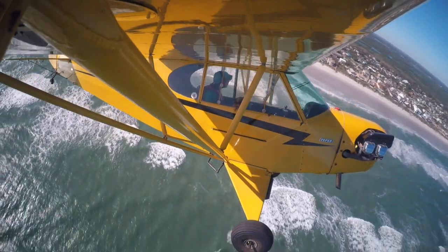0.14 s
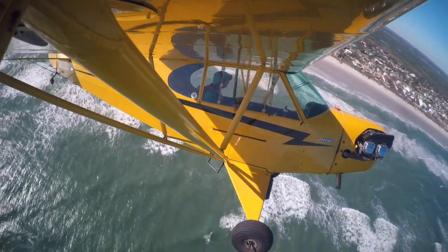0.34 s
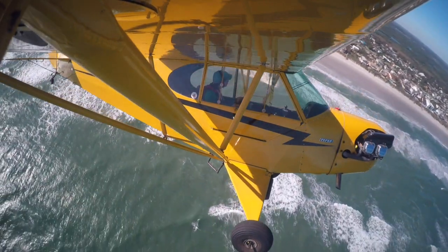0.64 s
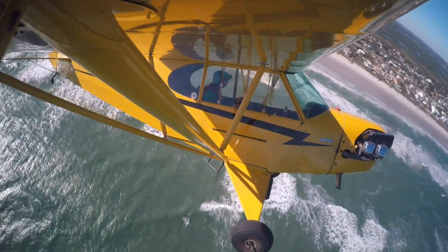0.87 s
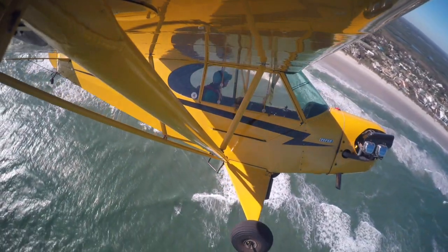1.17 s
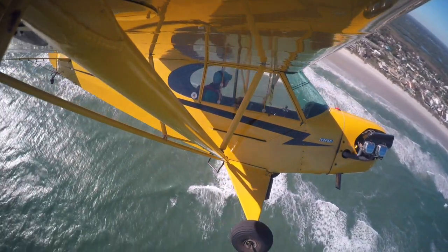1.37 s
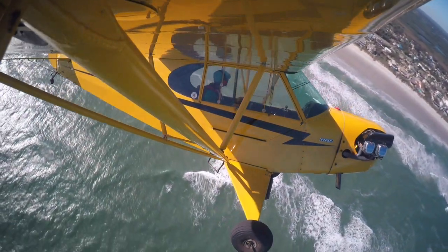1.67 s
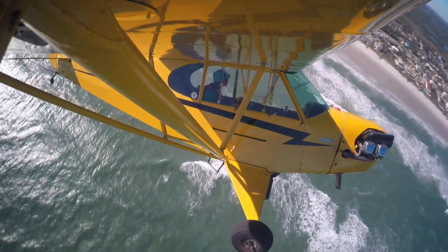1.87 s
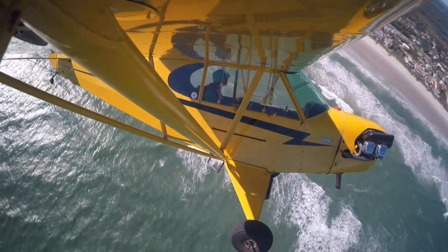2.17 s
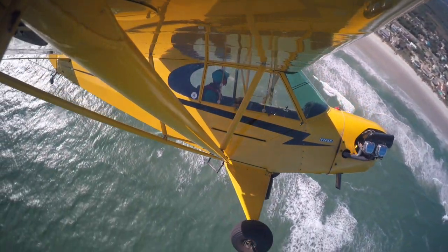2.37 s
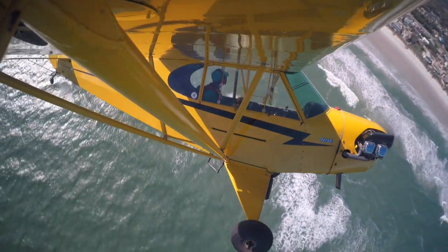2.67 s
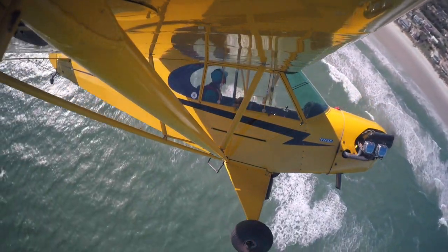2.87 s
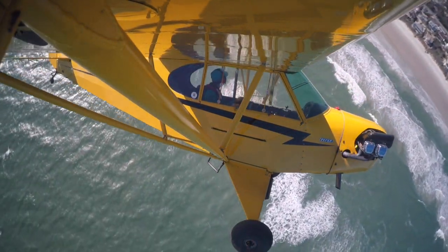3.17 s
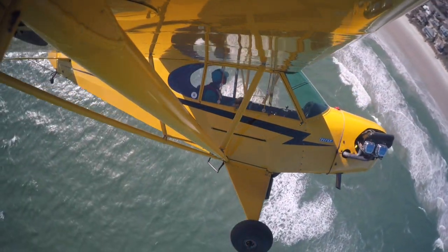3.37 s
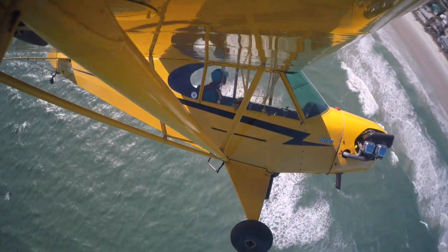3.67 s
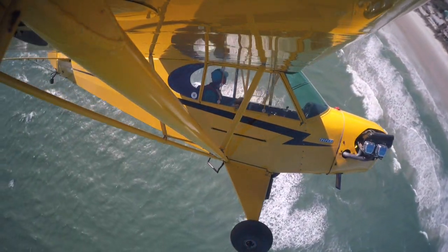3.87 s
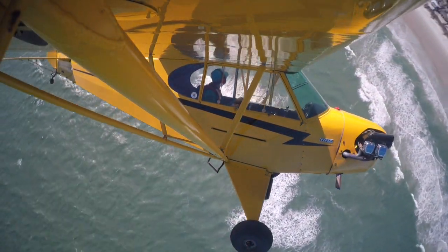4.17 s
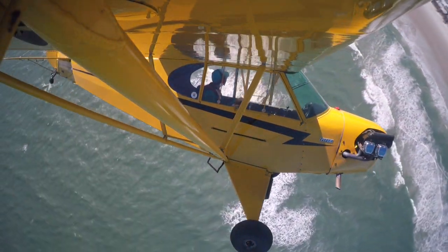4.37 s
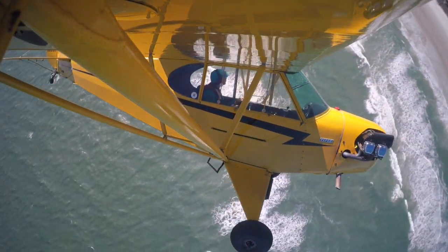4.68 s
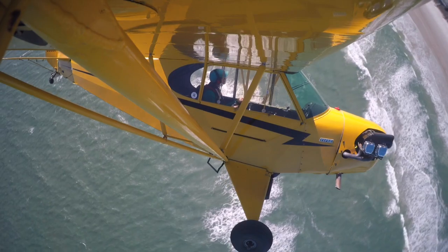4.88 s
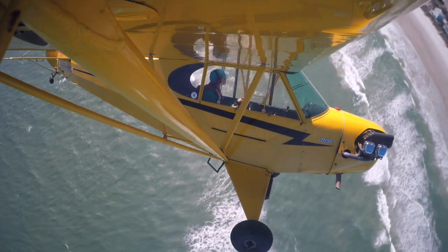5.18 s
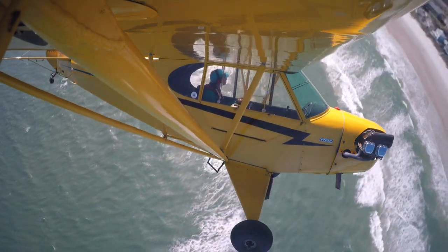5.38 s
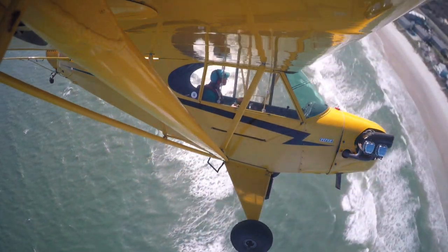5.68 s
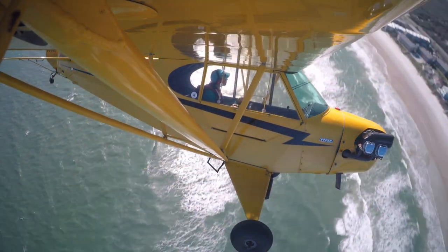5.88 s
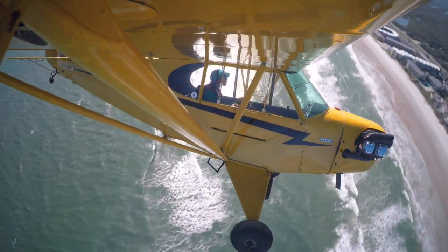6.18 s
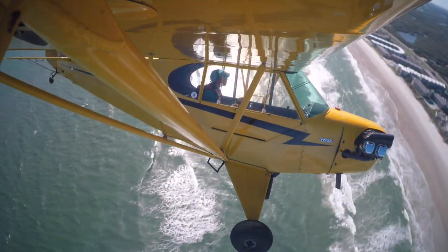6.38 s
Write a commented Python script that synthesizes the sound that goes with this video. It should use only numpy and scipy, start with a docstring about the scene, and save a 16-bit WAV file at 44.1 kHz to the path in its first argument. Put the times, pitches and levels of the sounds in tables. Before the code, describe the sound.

A small four-cylinder aeroplane is already in flight, heard close and dry in mono from a microphone mounted outside under the wing. Its deep drone holds near 80 hertz, rising almost imperceptibly by the end, with faint overtones and a rapid, slightly uneven exhaust sputter. Around it, low wind buffeting, rumble, propeller-wash roar and strut hiss run without pause. A quick gust bumps at 0.4 s. From 1.1 to 1.7 s the engine swells, staying fullest until 2.5 s while rumble recedes; it drops back by 3 s as a broader gust and a low hoot pass. Airflow hiss thins from about 2.5 s, leaving exhaust crackle clearer and a hollow howl around 400 hertz more evident. Between 4.8 and 6 s, unsteady low hoots sink in pitch, with another gust near 5.95 s. The flight noise continues to 6.5 s.

```python
"""Light aeroplane in a turn

A small four-cylinder aeroplane cruises through a turn, heard from a microphone out under its wing.
Engine: sines at multiples of half the firing rate, plus one sharp puff of noise per firing.
Airstream: shaped noise buffets, roars, howls, rumbles and hisses; wavering sines hoot now and then.
A look-ahead limiter rounds the loudest peaks."""
import sys
import numpy as np
from scipy import signal
from scipy.fft import rfft, irfft, next_fast_len
from scipy.io import wavfile
from scipy.ndimage import uniform_filter1d, minimum_filter1d

SR = 44100
rng = np.random.default_rng(int(sys.argv[2]) if len(sys.argv) > 2 else 0)


def persist_wave(psi):
    """Save psi, clipped to +-1, as 16-bit WAV."""
    counts = np.round(np.clip(psi, -1, 1) * 32767).astype(np.int16)
    wavfile.write(sys.argv[1], SR, np.atleast_2d(counts).T)


N = 288414
TIME_S = np.arange(N) / SR
EDGE_HZ = 15330  # upper band limit
FIRST_FIRING_S = 0.0096  # the first whole turn of the firing count ends here
USUAL_AIRFLOW_DB = -31

# Engine speed: t/s, firing rate/Hz
FIRING_RATE = [(0.0, 79.45), (1.0, 79.28), (2.0, 79.37), (3.0, 79.46), (4.0, 79.78), (5.0, 79.94),
               (6.0, 80.09), (6.54, 80.4)]
# Engine swell, how openly it reaches the microphone: t/s, level re usual/dB
ENGINE_SWELL = [(0, -2), (1.1, 0.5), (1.7, 3), (2.5, 3), (2.95, -0.8), (4.6, .5), (5.7, 0), (6.54, 0.7)]
# Engine orders: multiple of firing rate, level/dB, gain per engine swell/(dB/dB)
ENGINE_ORDERS = [(1.5, -37.5, -1), (2, -25, .5), (3, -32, .5), (3.5, -43, -2), (4, -29, 2.5), (4.5, -41, 0),
                 (5, -29, 0), (6, -52, 6), (7, -50, 3)]
# Cylinders in firing order: relative level/dB, lateness/firing periods
CYLINDERS = [(0.5, -0.03), (4, -0.1), (3.5, -0.072), (4, -.03)]
# Puff spectrum: f/Hz, relative density/dB
PUFF_SPECTRUM = [(1200, -15), (3000, -4), (3800, 2), (5000, 10), (6300, -2.5), (7000, -16), (7600, 2),
                 (8500, -11), (9250, 1.5), (10000, -5.5), (11700, 3.5), (13200, -5), (14000, -4),
                 (15300, -10)]
# Spectrum of the puff's reflection off the airframe: f/Hz, relative density/dB
REFLECTION_SPECTRUM = [(2000, -9), (4000, 11), (5000, 9), (6300, 6), (7700, -1), (8500, -9), (9300, 1),
                       (10200, -9), (12000, -3), (15300, -12)]
# Airflow past the housing, easing through the turn: t/s, level/dB (used re USUAL_AIRFLOW_DB)
AIRFLOW_LEVEL = [(0.0, -26), (0.5, -27.0), (0.9, -25.5), (1.3, -26.5), (1.6, -28), (2.3, -28.5),
                 (2.75, -30), (3.15, -33), (3.8, -31.1), (4.2, -32.8), (4.5, -32.5), (5.05, -34),
                 (5.35, -32.7), (5.65, -35.5), (5.95, -33), (6.54, -32.8)]
# Buffeting at the housing: f/Hz, relative density/dB
BUFFET_SPECTRUM = [(30, -12), (80, -5), (120, -3), (160, 0), (215, -0.5), (270, -0.5), (380, -3), (470, -3),
                   (540, -7.5), (620, -15.5), (850, -23.5), (2200, -39), (5000, -59.5)]
# Propeller wash: f/Hz, relative density/dB
ROAR_SPECTRUM = [(200, -38), (600, 4), (900, -1.5), (1250, -2.5), (1700, -6.5), (2400, -15.5), (5000, -44),
                 (12000, -53)]
# Gusts on buffeting and roar: t/s, half length/s, peak boost/dB
GUSTS = [(0.382, 0.086, 3), (2.647, 0.47, 2), (3.95, 0.23, 1), (5.95, 0.18, 2)]
# Band favoured by the eddies, shifting in the turn: t/s, centre f/Hz, level before trim/dB
HOWL_BAND = [(0, 280, -38), (2.1, 310, -22), (2.6, 410, -17), (4.2, 400, -16.5), (5.6, 375, -20.5),
             (6.54, 430, -15.5)]
# Large eddies pressing on the microphone: f/Hz, relative density/dB
RUMBLE_SPECTRUM = [(8, -27), (18, -12), (28, -4.5), (45, -1.5), (62, -2.5), (85, -4.5), (125, -7.5),
                   (220, -22), (1500, -76)]
# Air rushing past the struts: f/Hz, relative density/dB
RUSH_SPECTRUM = [(300, -13), (800, -5.5), (1300, -3.5), (1850, 2.35), (2300, -4), (2900, -0.5), (3700, -13),
                 (5000, -11.5), (6200, -20), (7600, -24.5), (8500, -32), (9300, -28), (12000, -33.5),
                 (15300, -35)]
# Eddies hooting on the housing: t/s, half length/s, mean f/Hz, level/dB
HOOTS = [(2.843, 0.16, 197, -14), (4.94, 0.15, 198.7, -18), (5.277, 0.53, 189.3, -15.5),
         (5.504, 0.13, 166.8, -14), (5.722, 0.26, 154.3, -13.5)]


def firings():
    """Firing count over time: the integral of the firing rate."""
    rate_hz = curve(FIRING_RATE)
    return 1 + np.cumsum(rate_hz) / SR - rate_hz[0] * FIRST_FIRING_S


def drone(turns, note_db=-19.0, waver_db=0.04, waver_hz=8.7, fade=0.25, fade_hz=8):
    """Firing note and engine orders; each follows the swell its own way and wavers in turbulent air."""
    swell_db = curve(ENGINE_SWELL)
    note_gain = gain_of(note_db + swell_db + waver_db * wander(waver_hz))
    out = note_gain * np.cos(2 * np.pi * turns)
    # one shaft turn per two firings: orders lie on multiples of half the firing rate
    for multiple, order_db, follow in ENGINE_ORDERS:
        angle = 2 * np.pi * (multiple * turns + rng.random())
        level = gain_of(order_db + follow * swell_db) * (1 + fade * wander(fade_hz))
        out += level * np.cos(angle + fade * wander(fade_hz))  # fade is also the phase waver/rad
    return np.sqrt(2) * out


def exhaust(turns, level_db=-45.3, follow=0.76, blown_away=0.55, waver_db=0.4, waver_hz=3,
            rise_periods=0.072, fall_periods=0.091, jitter_periods=0.023, uneven_db=0.6, stretch_db=2.3,
            tail_db=-5.0, tail_delay_periods=0.2, tail_decay_periods=0.32):
    """Each opening valve puffs noise, with a duller airframe reflection; strong airflow weakens both."""
    firing = np.floor(turns + 1 / 3).astype(int)
    cylinder_db, late = np.array(CYLINDERS)[firing % len(CYLINDERS)].T
    size, shift, spread = rng.standard_normal((1024, 3))[firing].T  # drawn once per firing
    age = turns - firing - late - jitter_periods * shift  # firing periods
    strength = gain_of(cylinder_db + uneven_db * size)

    # same gas in a short hard spit or a longer soft one
    stretch = gain_of(stretch_db * spread)
    width = np.where(age < 0, rise_periods, fall_periods) * stretch
    puff = np.exp(-0.5 * (age / width) ** 2) / np.sqrt(stretch)
    tail = (age > 0) * np.exp(-abs(age - tail_delay_periods) / tail_decay_periods)

    direct = coloured(strength * puff * rng.standard_normal(N), PUFF_SPECTRUM)
    reflected = coloured(strength * tail * rng.standard_normal(N), REFLECTION_SPECTRUM)
    loss_db = blown_away * np.maximum(airflow_db() - 2, 0)
    reach_db = follow * curve(ENGINE_SWELL) - loss_db + waver_db * wander(waver_hz)
    return gain_of(level_db + reach_db) * (direct + gain_of(tail_db) * reflected)


def buffet(level_db=-13.0, follow=-0.08, shelter=0.32, surge_db=0.32, surge_hz=3, lumps_db=1.52,
           lumps_hz=73, roar_db=-27.0, roar_follow=0.65, flurry_db=0.9, flurry_hz=40):
    """Eddies buffet the housing under the propeller wash's roar; gusts lift both, roar tracks airflow."""
    flow_db = airflow_db()
    eddies = rng.standard_normal(N) * gain_of(lumps_db * wander(lumps_hz))
    wash = rng.standard_normal(N) * gain_of(flurry_db * wander(flurry_hz))
    low = gain_of(level_db + follow * flow_db) * coloured(eddies, BUFFET_SPECTRUM)
    roar = gain_of(roar_db + roar_follow * flow_db) * coloured(wash, ROAR_SPECTRUM)
    gusts_db = sum(peak_db * bump(t_s, half_s) for t_s, half_s, peak_db in GUSTS)
    shared_db = gusts_db + surge_db * wander(surge_hz) - shelter * curve(ENGINE_SWELL)
    return gain_of(shared_db) * (low + roar)


def howl(trim_db=-3.5, half_width_hz=60):
    """Hollow band of turbulence whose centre and level shift through the turn."""
    level_db = curve(HOWL_BAND, column=2) + trim_db
    return gain_of(level_db) * narrow_noise(curve(HOWL_BAND), half_width_hz)


def rumble(level_db=-21.0, shelter=1.4):
    """Largest eddies press straight on the microphone; they ease while the engine swells."""
    noise = coloured(rng.standard_normal(N), RUMBLE_SPECTRUM)
    return gain_of(level_db - shelter * curve(ENGINE_SWELL)) * noise


def rush(turns, level_db=-30.5, follow=1.09, flutter_db=0.5, flutter_hz=70, beat_db=0.6):
    """Slipstream hiss past the struts, fluttering and beating slightly with the two propeller blades."""
    swing_db = flutter_db * wander(flutter_hz) + beat_db * np.cos(2 * np.pi * turns)
    air = rng.standard_normal(N) * gain_of(swing_db)
    return gain_of(level_db + follow * airflow_db()) * coloured(air, RUSH_SPECTRUM)


def hoots(unsteady=0.0812, unsteady_hz=29.4, rough=0.23, rough_hz=29):
    """Vortices shed in step for a moment: short, low tones, unsteady in pitch and level."""
    cycles_per_hz = np.cumsum(1 + unsteady * wander(unsteady_hz)) / SR
    swell = 1 + rough * wander(rough_hz)
    out = np.zeros(N)
    for t_s, half_s, pitch_hz, level_db in HOOTS:
        window = bump(t_s, half_s) ** 2
        out += gain_of(level_db) * window * np.sin(2 * np.pi * pitch_hz * cycles_per_hz)
    return np.sqrt(2) * swell * out


def airflow_db():
    """Airflow strength in dB re its usual level."""
    return curve(AIRFLOW_LEVEL) - USUAL_AIRFLOW_DB


def narrow_noise(centre_hz, half_width_hz):
    """Noise of rms about one around centre_hz: slow random signals on quadrature carriers."""
    angle = 2 * np.pi * np.cumsum(centre_hz * np.ones(N)) / SR
    return wander(half_width_hz) * np.cos(angle) + wander(half_width_hz) * np.sin(angle)


def wander(rate_hz):
    """Low-passed noise of rms one, moving no faster than about rate_hz."""
    size = next_fast_len(N)
    f_hz = np.fft.rfftfreq(size, 1 / SR)
    spectrum = rfft(rng.standard_normal(size)) / (1 + (f_hz / rate_hz) ** 4)
    return evened(irfft(spectrum, size)[:N])


def coloured(x, points):
    """Filters x by a (Hz, dB) curve, linear in dB over log frequency; rms one."""
    size = next_fast_len(N)
    point_hz, point_db = np.transpose(points)
    f_hz = np.fft.rfftfreq(size, 1 / SR)
    shape_db = np.interp(np.log(f_hz + 1), np.log(point_hz + 1), point_db)
    return evened(irfft(rfft(x, size) * gain_of(shape_db), size)[:N])


def bump(t_s, half_s):
    """Smooth rise and fall, peaking at one at t_s."""
    return np.cos(np.pi / 2 * np.clip((TIME_S - t_s) / half_s, -1, 1)) ** 2


def curve(rows, column=1):
    """One column of a time table, linearly interpolated."""
    columns = np.transpose(rows)
    return np.interp(TIME_S, columns[0], columns[column])


def evened(x):
    """Scales to rms one."""
    return x / np.sqrt(np.mean(x ** 2) + 1e-20)


def gain_of(db):
    """Decibels to amplitude."""
    return 10 ** (np.asarray(db) / 20)


def scene():
    """Engine plus airstream at one microphone."""
    turns = firings()
    engine = drone(turns) + exhaust(turns)
    wind = buffet() + howl() + rumble() + rush(turns) + hoots()
    return (engine + wind)[None]


def record(dry, ceiling=0.87):
    """Look-ahead limiter holds the peaks down; a low-pass then limits the band."""
    allowed = np.minimum(1, ceiling / (abs(dry) + 1e-9))
    gain = uniform_filter1d(minimum_filter1d(allowed, size=601), size=601)
    lowpass = signal.firwin(701, EDGE_HZ, window=("kaiser", 9), fs=SR)
    return signal.oaconvolve(dry * gain, lowpass[None], "same")


dry = scene()
out = record(dry)
persist_wave(out)
```